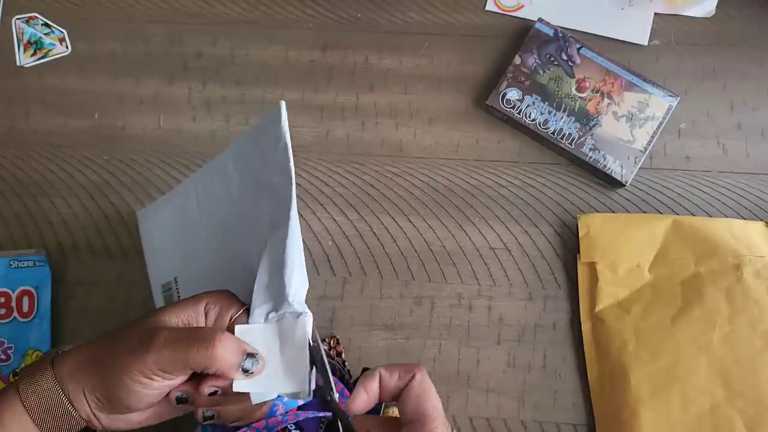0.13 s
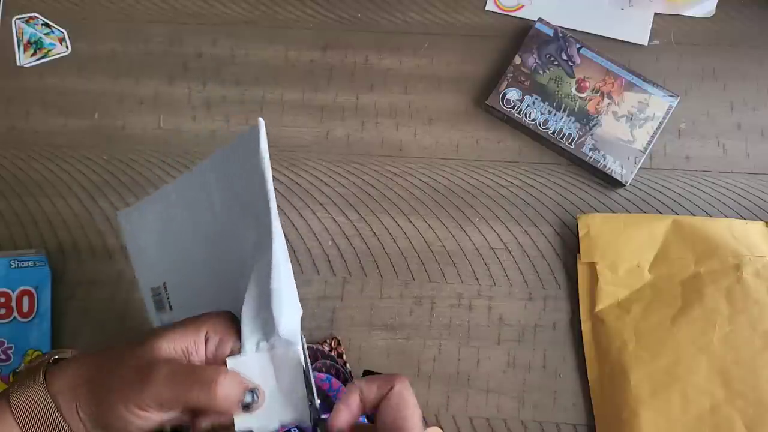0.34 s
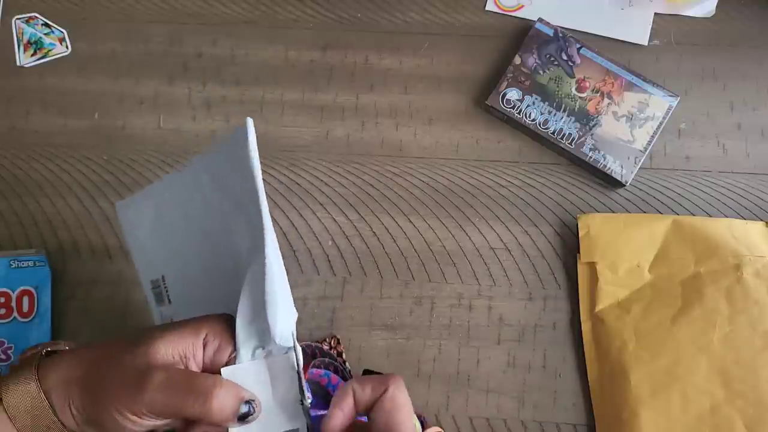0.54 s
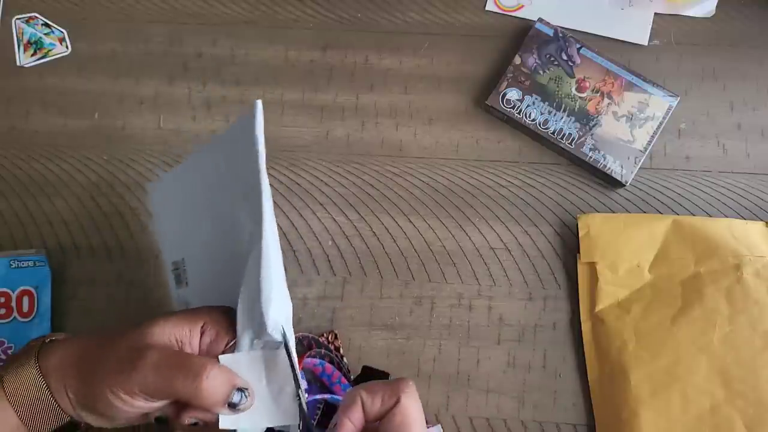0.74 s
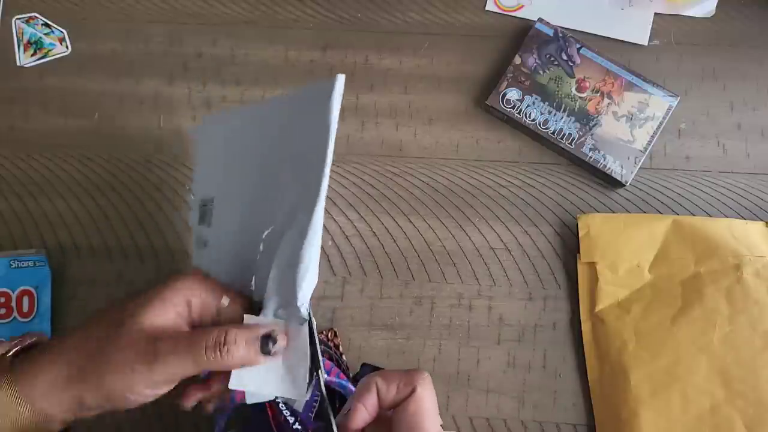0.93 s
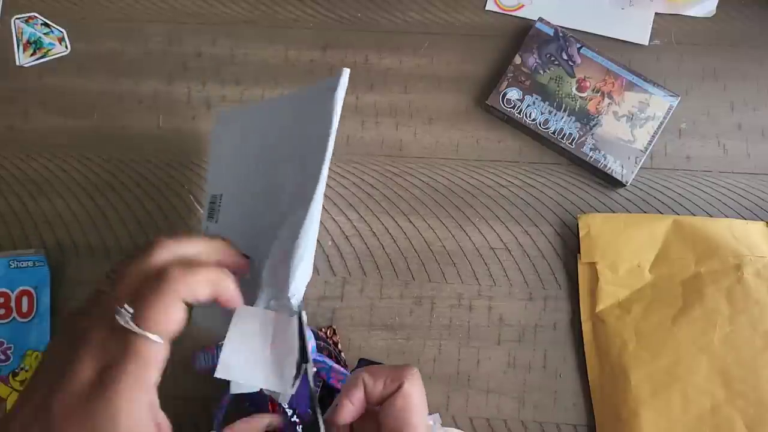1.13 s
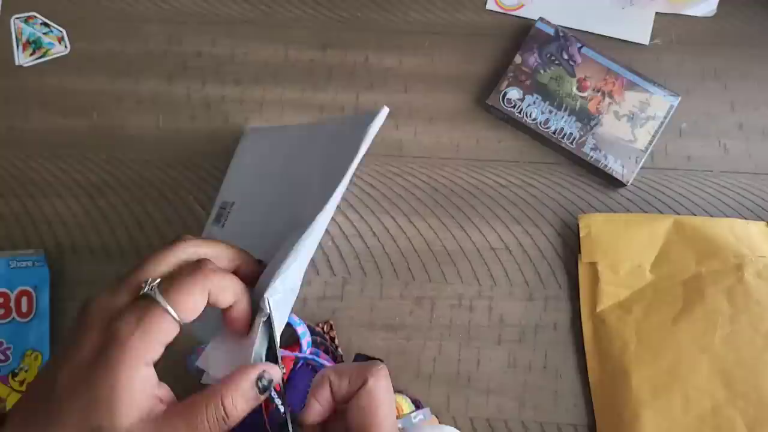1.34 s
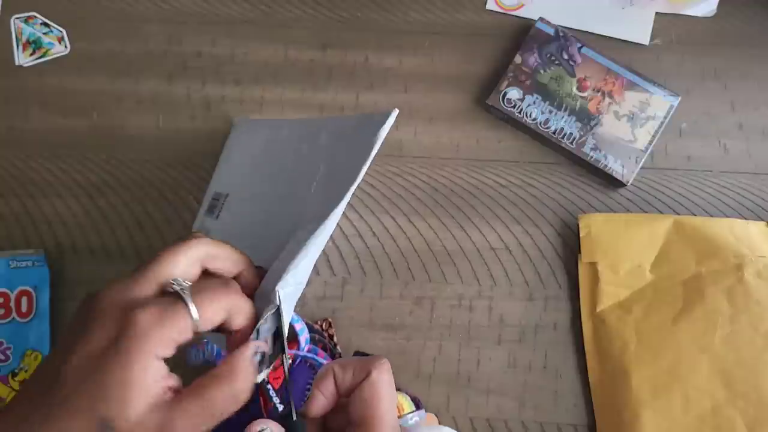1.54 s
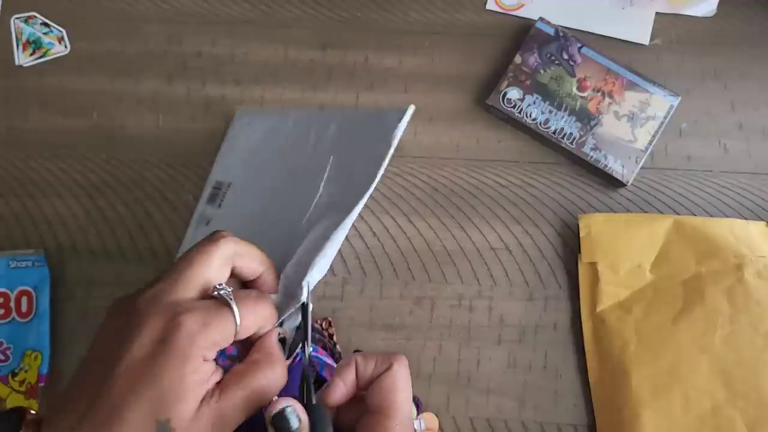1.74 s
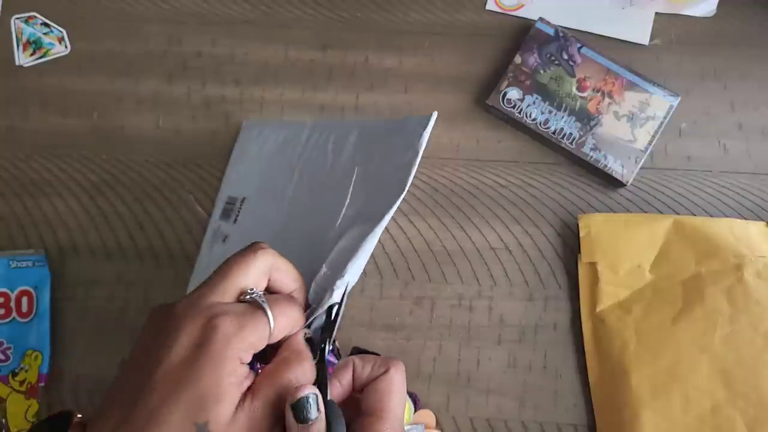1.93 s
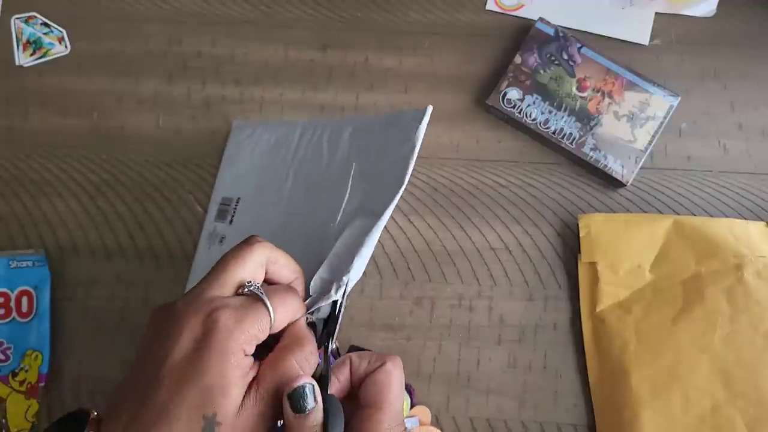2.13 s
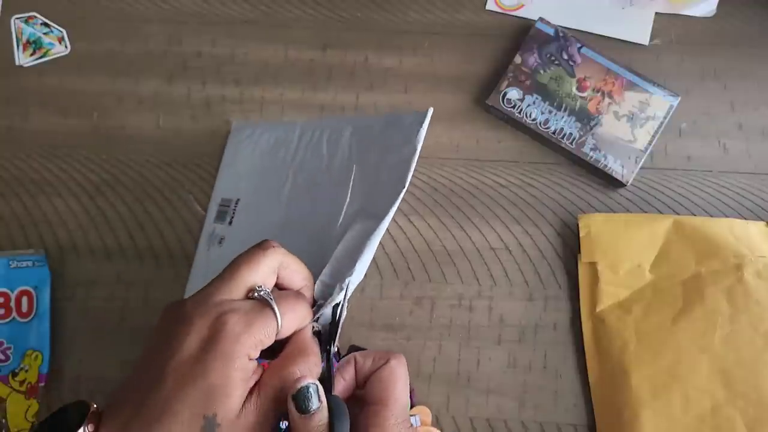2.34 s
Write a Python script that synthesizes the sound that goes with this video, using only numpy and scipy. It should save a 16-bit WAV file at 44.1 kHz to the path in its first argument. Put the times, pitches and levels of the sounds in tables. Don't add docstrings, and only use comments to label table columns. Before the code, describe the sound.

Plastic mailer crackling and rustling as scissors cut it, then it is pulled open on a table

```python
import sys
import numpy as np
from scipy import signal
from scipy.fft import rfft, irfft
from scipy.io import wavfile
from scipy.ndimage import uniform_filter1d

SR = 44100
rng = np.random.default_rng(int(sys.argv[2]) if len(sys.argv) > 2 else 0)


def file_out(sig):
    cols = np.atleast_2d(sig).T
    lim = np.clip(cols, -1, 1)
    pcm = np.round(lim * 32767).astype(np.int16)
    wavfile.write(sys.argv[1], SR, pcm)


def level_to_linear(level):
    exponent = np.asarray(level, float) / 20
    return 10 ** exponent


N = 105840


def evened(x):
    return x / np.sqrt(np.mean(x ** 2) + 1e-20)


def read(points, hz):
    f, value = np.transpose(points)
    return np.interp(np.log(hz + 1), np.log(f + 1), value)


def colour(x, gain_db):
    hz = np.abs(np.fft.fftfreq(4096, 1 / SR))
    log_gain = np.log(level_to_linear(np.maximum(gain_db(hz), -100)))
    taps = np.fft.ifft(np.exp(signal.hilbert(log_gain).conj())).real[:2048]
    return signal.oaconvolve(x, taps[None], axes=1)[:, :N]


def ring(x, hz, width):
    r = np.exp(-np.pi * width / SR)
    return signal.lfilter([1, 0, -r], [1, -2 * r * np.cos(2 * np.pi * hz / SR), r * r], x)


def add(mix, s, sound, peak_db, pan_db):
    peak_lag_s = 0.0009
    start = round((s + peak_lag_s) * SR) - np.abs(sound).argmax()
    part = mix[:, start:][:, :len(sound)]
    sides = level_to_linear(peak_db + np.array([[.5], [-.5]]) * pan_db)
    part += sides * sound[:part.shape[1]] / np.abs(sound).max()


def room_tone():
    # f/Hz, level/dB per Hz
    room_spectrum = [(15, -26), (25, -7.5), (92, -2), (163, -14.5), (265, -13), (432, -17.5), (5110, -62),
                     (13600, -53), (16400, -90.5)]
    # f/Hz, correlation [0..1]
    likeness = [(40, 1), (100, 0.96), (250, 0.95), (2000, 0.12)]
    # f/Hz, level/dB
    hums = [(58.5, -89), (85.6, -77), (47.4, -72), (106.3, -72)]
    level_db = -64
    hz, t = np.fft.rfftfreq(N, 1 / SR), np.arange(N) / SR
    left, other = rfft(rng.standard_normal((2, N)))
    same = np.clip(read(likeness, hz), -1, 1)
    right = same * left + np.sqrt(1 - same ** 2) * other
    rumble = irfft(np.array([left, right]) * level_to_linear(read(room_spectrum, hz)), N)
    out = level_to_linear(level_db) * evened(rumble)
    for f, db in hums:
        out = out + level_to_linear(db) * np.sqrt(2) * np.sin(2 * np.pi * (f * t + rng.random()))
    return out


def echoes(x, t60, delay):
    t, out = np.arange(SR // 3) / SR, np.zeros((2, N))
    for k in range(3):
        signs = rng.choice([-1., 1.], (2, len(t)))
        hits = rng.random((2, len(t))) < .08
        taps = signs * hits * level_to_linear(-60 * t / t60) * (t > delay)
        turn = np.sqrt(2 / 3) * np.cos(np.pi * (7 * np.arange(N) / SR + k / 3))
        out += signal.oaconvolve(x * turn, taps / np.linalg.norm(taps[0]), axes=1)[:, :N]
    return out


def wander(first, second):
    return evened(uniform_filter1d(uniform_filter1d(rng.standard_normal(N), first), second))


def crease_ticks():
    grains_per_s, spread_db, grain_t60 = 2600, 3.0, 0.006
    strength = level_to_linear(spread_db * np.minimum(rng.exponential(1, N), 4))
    size = strength * (rng.random(N) < grains_per_s / SR)
    kind, u = rng.integers(0, 24, N), np.arange(200) / SR
    out = np.zeros((2, N))
    for k, hz in enumerate(np.geomspace(700, 15000, 24)):
        grain = ring(rng.standard_normal(200) * level_to_linear(-60 * u / grain_t60), hz, 0.54 * hz)
        grain = grain / np.linalg.norm(grain) * np.sqrt(hz)
        lean = level_to_linear(1.1 + 8.3 * rng.uniform(-0.69, 1) * np.array([[1], [-1]]))
        out += lean * signal.oaconvolve(size * (kind == k), grain)[:N]
    return evened(out)


def rustle():
    # t/s, rustle level/dB, brightness/dB
    cut_grip = [(0, -48.5, -5.5), (0.037, -61.5, -1), (0.101, -64, -8), (.125, -55, -7), (0.199, -64, -0.5),
                (.27, -59.5, -3), (.36, -52.5, -6), (.44, -49, 5), (.462, -55.5, -7), (0.526, -66, -8.5),
                (0.558, -59, -4), (0.609, -57.5, -2), (0.709, -45.5, -5.5), (.81, -58.5, -8.5),
                (.86, -52, -4.5), (.95, -52.5, -6), (0.999, -57.5, -4.5), (1.061, -75.5, -7.5)]
    # t/s, rustle level/dB, brightness/dB
    pull_grip = [(1.181, -77.5, -6), (1.192, -59.5, -6.5), (1.253, -52, 1), (1.424, -56.5, -6),
                 (1.467, -49, 5), (1.492, -53.5, 7.5), (1.522, -45.5, -2.5), (1.543, -53.5, -7.5),
                 (1.594, -55.5, 4.5), (1.628, -50.5, 11), (1.648, -60.5, 10), (1.7, -52, -1),
                 (1.86, -52, -2), (2.04, -62, 3), (2.2, -53, -10), (2.249, -55.5, -2), (2.287, -62, -6.5),
                 (2.4, -52.5, 1)]
    # f/Hz, level/dB per Hz
    rustle_spectrum = [(150, -50.5), (250, -5.5), (394, 5.5), (715, -6.5), (2010, -7.5), (4490, -2),
                       (13500, -6), (15600, -2.5), (16400, -76)]
    # f/Hz, width/Hz, level/dB
    film = [(1398, 244, -12), (2100, 226, -6.5), (2833, 470, -12.5), (6030, 1200, -15), (7710, 210, -12),
            (12700, 3700, 0.5)]
    hiss_db, film_wander_db, clump_db = -4, 4, 1.3
    a, b = rng.standard_normal((2, N))
    hiss = level_to_linear(hiss_db) * np.array([a + 0.91 * b, a - 0.5 * b])
    raw = colour(crease_ticks() + hiss, lambda hz: read(rustle_spectrum, hz))
    out = raw
    for hz, width, db in film:
        come_and_go = level_to_linear(db + film_wander_db * wander(1500, 900))
        out = out + np.std(raw) * come_and_go * evened(ring(raw, hz, width))

    s, level_db, bright_db = np.transpose(cut_grip + pull_grip)
    t = np.arange(N) / SR
    loud_clumps, bright_clumps = wander(500, 300), wander(500, 300)
    dull = signal.lfilter(*signal.butter(2, 4200, fs=SR), out)
    tilt = level_to_linear(.5 * np.interp(t, s, bright_db) + clump_db * bright_clumps)
    mixed = (dull / tilt + (out - dull) * tilt) / np.std(out)
    return mixed * level_to_linear(np.interp(t, s, level_db) + clump_db * loud_clumps + 1.5)


def knocks():
    # t/s, peak level/dB, ring f/Hz, left lean/dB
    table_knocks = [(0.0488, -47.5, 635, 5), (0.3756, -34, 427, 6), (0.4045, -38, 427, 4),
                    (0.7554, -44, 380, -7), (0.9583, -50.5, 410, 2.0), (1.2988, -44.5, 430, -1.5),
                    (1.6653, -52.5, 399, 14), (1.7266, -43.5, 380, 2.5), (1.7996, -41.5, 417, 0.5),
                    (1.826, -52.5, 363, -7), (2.0974, -42.5, 417, -3), (2.1801, -48, 327, 4),
                    (0.557, -51, 560, 2),
        (1.285, -50, 370, -2),
        (0.727, -48, 740, 4),
    ]
    out, t = np.zeros((2, N)), np.arange(3000) / SR
    for s, db, hz, pan_db in table_knocks:
        push = rng.standard_normal(3000) * np.minimum(t / .002, 1) * level_to_linear(-60 * t / 0.031)
        top = evened(ring(ring(push, hz, 300), hz, 520))
        overtone = evened(ring(ring(push, 1.9 * hz, 600), 1.7 * hz, 720))
        thud = evened(ring(ring(push, 160.0, 86), 102, 100))
        add(out, s, top + 0.3 * overtone + 0.232 * thud, db, pan_db)
    return out


def pop(hz, length_s):
    t = np.arange(1200) / SR
    kicks = rng.standard_normal(1200) * np.minimum(t / 0.0017, 1) * level_to_linear(-30 * t / length_s) * 0.39
    kicks[40] = 1
    wall = evened(ring(ring(kicks, hz, 0.25 * hz), hz, 2.0 * hz))
    pouch = 0.5 * evened(ring(kicks, 1400, 300)) + 0.51 * evened(ring(kicks, 2250, 400))
    return signal.lfilter(*signal.butter(2, [600, hz + 1800], "band", fs=SR), wall + pouch)


def pops():
    # t/s, peak level/dB, ring f/Hz, left lean/dB
    pouch_pops = [(0.0249, -48, 2280, 3.0), (0.048, -27, 2600, 4.5), (0.054, -35, 1340, 2.0),
                  (0.131, -34, 2500, -0.5), (0.1377, -34.5, 1520, 4), (0.1783, -41.5, 3320, 4.0),
                  (0.2137, -32.0, 2400, 3.5), (0.2782, -36, 2740, 9), (0.3744, -22.5, 2330, 2),
                  (0.3832, -25.5, 1330, 3), (0.3952, -29.5, 2330, 6), (0.4023, -21.5, 2460, 6),
                  (0.6248, -32, 2100, 3.5), (0.7222, -29.5, 2170, 4.5), (0.7464, -36.0, 2230, -3),
                  (0.755, -30.5, 2100, 2), (0.7573, -28.5, 2020, 7), (0.764, -29.5, 1185, 3.5),
                  (0.7743, -30.5, 2850, 7), (0.8287, -31, 2720, 7.5), (0.833, -33, 2730, 0),
                  (0.872, -37, 1330, 4.5), (0.8826, -39.0, 1330, 9), (0.9562, -29.5, 2320, 3),
                  (0.9763, -37.5, 2530, 6), (1.034, -49.5, 3500, 5), (1.1889, -43, 2080, 5),
                  (1.2076, -43, 2120, 8), (1.268, -43, 3000, 11), (1.466, -41, 2800, 12),
                  (1.5209, -42, 2250, 14), (1.592, -40, 1388, 5.5), (1.624, -31.5, 2700, 3),
                  (1.627, -37, 2800, -1), (1.6629, -26.5, 2100, 0.0), (1.7233, -39.5, 2240, 1.0),
                  (1.7716, -37.5, 2100, 2), (1.7964, -46, 1993, 6), (1.8558, -40.5, 2100, 0),
                  (1.8719, -34.5, 2740, 7), (1.991, -38, 3230, 4), (2.0933, -29, 3235, 0.5),
                  (2.0999, -34.5, 1950, 8), (2.1766, -40.5, 1010, 3), (2.2217, -39.5, 1140, 4.5),
                  (2.3848, -45.5, 2680, -3.5)]
    out = np.zeros((2, N))
    for s, db, hz, pan_db in pouch_pops:
        add(out, s, pop(hz, 0.004), db, pan_db)
    return out


def blade_judder():
    # last slip t/s, last gap/s, each earlier gap as a share of the next [ratio]
    judder = (.4399, .0065, .82)
    last, gap, shrink = judder
    last_db, step_db = -22, -1.5
    out = np.zeros((2, N))
    for k in range(8):
        s = last - gap * (1 - shrink ** k) / (1 - shrink)
        add(out, s, pop(1730, 0.002), last_db + k * step_db, 1.7)
    return out


def cracks():
    # t/s, peak level/dB, brightest f/Hz, left lean/dB
    film_cracks = [(0.05, -36, 12550, 2), (0.114, -33.5, 11820, 1), (0.1324, -32.5, 11820, -3),
                   (0.1378, -42.5, 4350, 2), (0.2143, -33, 8300, -3.5), (0.2175, -28, 11610, -1.5),
                   (0.2772, -35.5, 13810, 2.0), (0.354, -42, 12510, -3), (0.373, -25, 13000, 2.5),
                   (0.3835, -30, 7920, -1), (0.3951, -22, 12270, 6), (0.4031, -12.5, 11600, 0),
                   (0.411, -26, 13800, 6), (0.434, -28.5, 14010, 1), (0.439, -28.5, 6640, -0.5),
                   (0.7235, -26.5, 13600, 2), (0.7544, -33, 5730, -3.0), (0.7748, -25, 13220, 1),
                   (0.783, -30.5, 13160, -4), (0.827, -22, 13450, -0.5), (0.8342, -40, 13300, -2),
                   (0.8686, -35, 12040, 4), (0.9567, -28, 13600, 0), (0.9765, -35, 7500, 4.0),
                   (1.0347, -48, 7800, 6.5), (1.1383, -51.0, 12600, 2.5), (1.2078, -37, 11800, 0),
                   (1.512, -38, 12130, 7), (1.6234, -27, 12800, 3), (1.6303, -25, 12500, 3),
                   (1.6346, -42, 12100, 2), (1.663, -24, 11660, 3.0), (1.672, -29.5, 13960, -2),
                   (1.6898, -32.5, 6170, 1.5), (1.7423, -36, 12040, 3.0), (1.7472, -47, 13120, -3.0),
                   (1.773, -33.5, 3970, 2.5), (1.8186, -37.5, 5500, 2), (1.8262, -31.5, 7200, 0.5),
                   (1.8724, -30, 13600, -4), (1.955, -42, 11900, 0), (1.9888, -31, 6500, -1),
                   (2.093, -28, 4770, -2), (2.1779, -32.5, 5500, 0), (2.2339, -40, 11700, -2),
                   (2.244, -34.5, 12000, -2), (2.2714, -42.5, 13500, -3), (2.3406, -30.5, 12400, -1.5)]
    # f/Hz, level/dB per Hz
    crack_spectrum = [(1470, -41), (2500, -17.5), (3140, 0), (3620, -11), (6900, -6), (9160, -8.5),
                      (11400, -5.5), (14800, 1.5), (16400, -27.5)]
    creep_s, creep_db, crack_t60 = 0.004, -20, 0.0055
    out, t = np.zeros((2, N)), np.arange(900) / SR - creep_s
    shape = level_to_linear(read(crack_spectrum, np.fft.rfftfreq(900, 1 / SR)))
    creep = level_to_linear(creep_db) * np.clip(1 + t / creep_s, 0, 1) ** 2
    attack = np.maximum(np.minimum(t / 0.00011, 1), level_to_linear(creep_db))
    decay = level_to_linear(-60 * t / crack_t60) + level_to_linear(-18.5 - 60 * t / 0.028)
    swell = np.where(t < 0, creep, attack * decay)
    for s, db, hz, pan_db in film_cracks:
        noise = evened(irfft(rfft(rng.standard_normal(900)) * shape))
        bright = noise + 0.49 * evened(ring(noise, hz, 1000))
        spit = signal.lfilter(*signal.butter(2, min(2.1 * hz, 20000), fs=SR), bright)
        add(out, s, spit * swell, db, pan_db)
    return out


def scene():
    snaps = cracks() + pops() + blade_judder() + knocks()
    shiver = colour(echoes(snaps, 0.023, 0.0016), lambda hz: -6.5 + np.log2((hz + 100) / 2000))
    left_db = -0.8
    near = (snaps + shiver + rustle()) * level_to_linear(left_db * np.array([[.5], [-.5]]))
    walls = colour(echoes(near, 0.066, 0.012), lambda hz: -10 - 2.9 * np.log2((hz + 100) / 2000))
    return near + walls + room_tone()


def roll_off(x):
    return signal.sosfilt(signal.butter(12, 16810, fs=SR, output="sos"), x)


def record(dry):
    # f/Hz, gain/dB
    side_lift = [(120, 4), (350, 6.5), (1200, 3), (12000, 5)]
    # f/Hz, gain/dB
    overall_tone = [(28, -33), (42, 0.5), (4300, 0.5), (5200, -2), (6200, 2.5), (8300, -2), (9050, -4),
                    (10200, -1.5)]
    mid = (dry[:1] + dry[1:]) / 2
    side = colour((dry[:1] - dry[1:]) / 2, lambda hz: read(side_lift, hz))
    heard = colour(np.concatenate([mid + side, mid - side]), lambda hz: read(overall_tone, hz))
    return roll_off(heard)


dry = scene()
out = record(dry)
file_out(out)
```